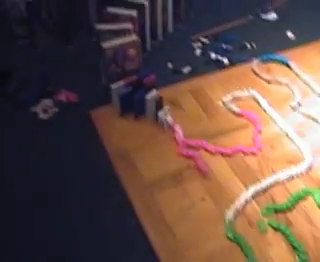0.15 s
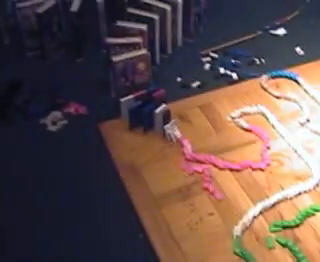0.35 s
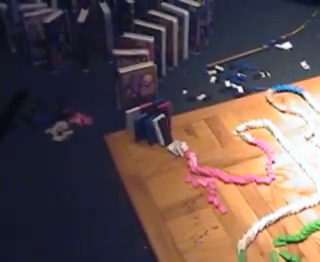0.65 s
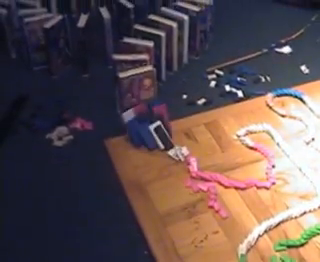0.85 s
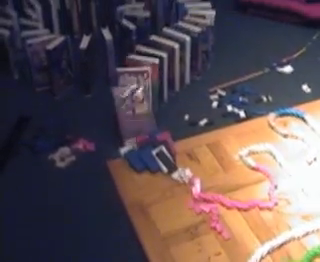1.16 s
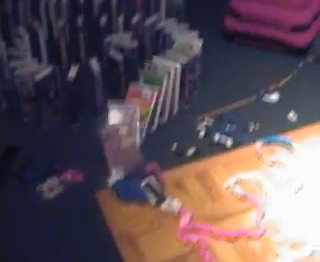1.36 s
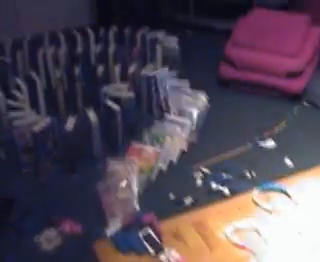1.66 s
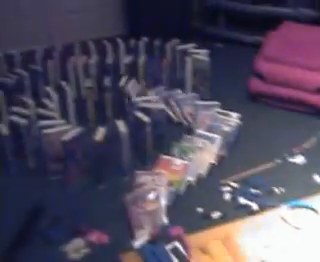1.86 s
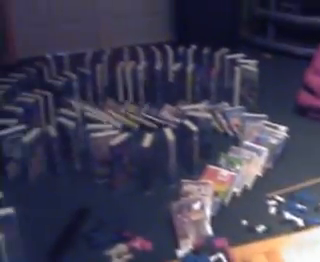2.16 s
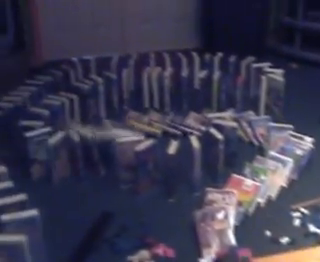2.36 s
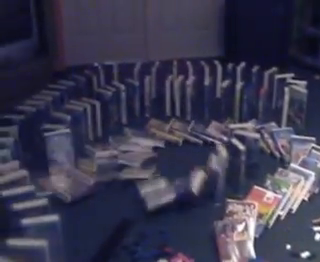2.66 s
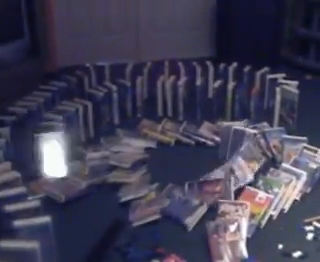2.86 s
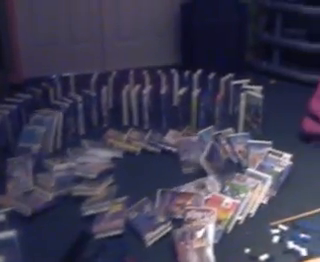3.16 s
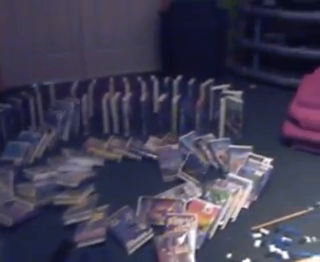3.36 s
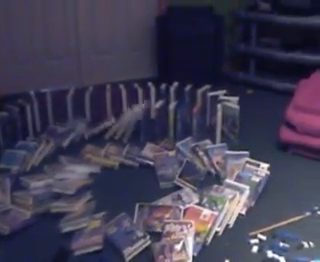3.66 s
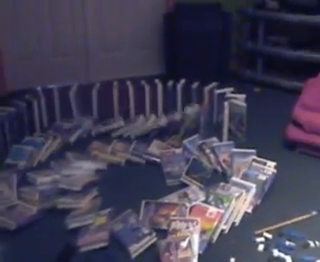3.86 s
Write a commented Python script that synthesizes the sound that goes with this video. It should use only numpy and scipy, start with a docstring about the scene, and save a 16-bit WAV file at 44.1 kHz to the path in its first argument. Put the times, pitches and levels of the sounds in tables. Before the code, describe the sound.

A domino run topples: light clicks, a few woody knocks, then a growing clatter of plastic cases

```python
"""A bare, echoing room in which a chain of dominoes falls before a close pair of microphones.
Small hard tiles patter on a wooden floor, a few larger blocks knock over, then a long spiral of hollow
plastic cases slaps down on carpet. Each contact is an impulse that excites damped modes (modal synthesis);
the room adds decaying noise as a diffuse echo. Low thumps of overload and a faint steady noise lie beneath."""
import sys
import numpy as np
from scipy import signal
from scipy.fft import rfft, irfft
from scipy.io import wavfile

SR = 44100
rng = np.random.default_rng(int(sys.argv[2]) if len(sys.argv) > 2 else 0)


def volts_from_db(level):
    """Convert decibel levels to linear amplitude ratios."""
    exponent = np.asarray(level, float) / 20
    return 10 ** exponent


def dump_mix(stems):
    """Bounce the given channels to the path in sys.argv[1] as a 16-bit WAV at rate SR."""
    frames = np.atleast_2d(stems).T  # one column per channel
    limited = np.clip(frames, -1, 1)  # hard clip at full scale
    pcm = np.round(limited * 32767).astype(np.int16)
    wavfile.write(sys.argv[1], SR, pcm)


N = 176400  # samples, 4 s
PLACES = 4  # each source sounds from this many spots, its listed contacts dealt in turn


def at_hz(points, hz):
    """Spectra are read on a logarithmic frequency axis, as pitch is heard."""
    table_hz, values = np.array(points).T
    return np.interp(np.log(hz), np.log(table_hz), values)


def short_modes(colour, low_hz, high_hz, cycles, count):
    """Constant damping per cycle: modes spread evenly in pitch decay by 60 dB in the same number of cycles."""
    modes = []
    for hz in np.geomspace(low_hz, high_hz, count):
        level_db = at_hz(colour, hz) + 20 * np.log10(hz / 1000)  # the colour, raised 6 dB per octave
        modes.append((hz, level_db, cycles / hz))
    return modes


def patter(rows, per_s, spread_db):
    """Random independent contacts: uniform times, table columns read there, exponential scatter in dB."""
    s, *columns = np.transpose(rows)
    candidates_per_s = 400
    draw = rng.random((int(candidates_per_s * (s[-1] - s[0])), 3))
    t = s[0] + draw[:, 0] * (s[-1] - s[0])
    scatter = -spread_db * np.log(1 - draw[:, 1] + 1e-3)
    silenced = draw[:, 2] > per_s / candidates_per_s  # thins the contacts to the wanted density
    db = np.interp(t, s, columns[0]) + scatter - 200 * silenced
    db = db - 10 * np.log10(per_s)  # denser contacts are each weaker
    return [t, db] + [np.interp(t, s, column) for column in columns[1:]]


def strike(t, db, modes, scatter_db, spread_s=0):
    """Modal impact: each contact excites every damped resonance with its own strength, sign and delay.
    db is contacts x modes; modes are (frequency [Hz], level [dB], t60 [s])."""
    gains = volts_from_db(db + scatter_db * rng.standard_normal(db.shape)) * rng.choice([-1, 1], db.shape)
    at = np.clip((t[:, None] + spread_s * rng.random(db.shape)) * SR, 0, N - 1).astype(int)
    out = np.zeros(N)
    for (hz, level_db, t60), gain, index in zip(modes, gains.T, at.T):
        radius, w = volts_from_db(-60 / (t60 * SR)), 2 * np.pi * hz / SR
        resonance = [1, -2 * radius * np.cos(w), radius * radius]
        # a soft contact low-passes the blow an octave above the mode
        p = np.exp(-2 * w)
        poles = np.convolve(resonance, [1, -2 * p, p * p])
        # the difference [1, -1] passes on no slow push
        zeros = np.cos(w / 2) * (1 - p) ** 2 * np.array([1, -1])
        blows = np.bincount(index, gain * volts_from_db(level_db), N) + 1e-18
        out += signal.lfilter(zeros, poles, blows)
    return out


def crack(t, db):
    """Broadband impact transient: many short modes make a crack; db is contacts x modes or one column."""
    # colour of a crack: (frequency [Hz], level [dB])
    crack_colour = [(250, -34), (700, -16), (1300, -12), (2500, -10.5), (4500, 0), (7500, -22.5),
                    (10000, -22), (13000, -35)]
    modes = short_modes(crack_colour, 310, 19000, cycles=6.0, count=30)
    return strike(t, db + np.zeros(len(modes)), modes, scatter_db=0.0, spread_s=0.0026)


def tiles(turn):
    """Stiff small bodies have high modes: hard tiles click on each other, singly and in a patter."""
    # single clear clicks: (time [s], relative ring level [dB], relative crack level [dB])
    tile_clicks = [(0.001, -24, -43.5), (0.047, -48, -46), (0.062, -35, -49), (0.0820, -22.5, -44),
                   (0.1121, -20, -53), (0.1431, -20, -39), (0.1795, -11, -26), (0.1884, -12.5, -50),
                   (0.2104, -16, -39), (0.2204, -25, -50), (0.2346, -27, -30), (0.264, -27, -56),
                   (0.3262, -22, -38), (0.3336, -21, -36.5), (1.3132, -27, -40.5), (1.3235, -23, -45),
                   (1.368, -12.5, -54), (1.376, -14.5, -43), (1.4194, -36, -47), (1.5264, -30, -42),
                   (1.5582, -39, -52), (1.684, -18, -50), (1.699, -30, -41), (1.7147, -26, -48)]
    # patter of the tile row: (time [s], relative level [dB])
    tile_patter = [(0, -50), (.1, -35.5), (.22, -40), (.3, -44.5), (.36, -48), (.42, -75), (1.3, -79),
                   (1.33, -48), (1.43, -51), (1.6, -56), (1.68, -69), (1.74, -57), (1.8, -66)]
    # modes of a middling tile: (frequency [Hz], level [dB], t60 [s])
    tile_modes = [(4310, -16, 0.014), (5122, 3, 0.032), (5570, -9, 0.018), (6800, -4, 0.0035),
                  (8620, -6, 0.014), (11730, -8, 0.0081)]
    tiles_per_s, pitch_step = 230, 0.0078  # over all spots; relative pitch from spot to spot
    patter_t, patter_db = patter(tile_patter, tiles_per_s / PLACES, spread_db=3.5)
    click_t, ring_db, crack_db = np.transpose(tile_clicks[turn::PLACES])
    t, patter_db = np.r_[click_t, patter_t], patter_db + 13
    pitch = 1 + pitch_step * (turn - (PLACES - 1) / 2)
    modes = [(hz * pitch, level_db, t60) for hz, level_db, t60 in tile_modes]
    ring_levels = np.r_[ring_db - 12, patter_db][:, None] + np.zeros(len(modes))
    rings = strike(t, ring_levels, modes, scatter_db=2.0, spread_s=0.0014)
    cracks = crack(t, np.r_[crack_db, patter_db - 18.5][:, None])
    return signal.sosfilt(signal.butter(6, 12800, fs=SR, output="sos"), rings + cracks)


def blocks(turn):
    """Larger bodies have lower modes: blocks knock, each with its own spectral tilt, and rattle between."""
    # knocks: (time [s], relative level [dB], brightness [dB per octave])
    block_knocks = [(0.4234, -26.5, -7), (0.5387, -13.5, 3), (0.5529, -25.5, -8), (0.630, -5.5, 4.5),
                    (0.6338, -12.5, 10.5), (0.6415, -10, -5), (0.7639, -10, 5.5), (0.7722, -18.5, -4.5),
                    (0.823, -17.5, -6), (0.8389, -11, 2.5), (0.859, -23, -1), (0.8787, -15.5, -5.5),
                    (0.9748, -18.5, -5), (0.9822, -12.5, 3), (0.9888, -9.5, 1.5), (1.0294, -12, -1),
                    (1.0698, -18.5, -3.5)]
    # blocks sliding and settling: (time [s], relative level [dB])
    block_rattle = [(.4, -52), (.45, -50.5), (.62, -73), (.66, -35.5), (.75, -40), (.87, -27), (.96, -42),
                    (1.02, -28), (1.1, -40.5), (1.16, -79.5)]
    # block modes: (frequency [Hz], level [dB], t60 [s])
    block_modes = [(352, -21.5, 0.045), (570, -5.5, 0.0067), (1356, 1, 0.0067), (1530, 2, 0.0038),
                   (2020, -2, 0.012), (3030, 0.5, 0.0049), (5060, -8.5, 0.0084), (6250, -12.5, 0.0077),
                   (8440, -25, 0.012), (9400, -15.5, 0.0089)]
    rattles_per_s, tilt_pivot_hz = 300, 2000  # the rate is over all spots
    rattle_t, rattle_db = patter(block_rattle, rattles_per_s / PLACES, spread_db=4.0)
    knock_t, knock_db, bright = np.transpose(block_knocks[turn::PLACES])
    t = np.r_[knock_t, rattle_t]
    db = np.r_[knock_db - 11, rattle_db + 11][:, None]
    bright = np.r_[bright, 0 * rattle_t][:, None]  # the rattle is untilted
    ring_octaves = np.log2(np.array(block_modes)[:, 0] / tilt_pivot_hz)
    rings = strike(t, db + bright * ring_octaves, block_modes, scatter_db=2.0, spread_s=.0012)
    crack_octaves = np.log2(np.geomspace(260, 13000, 30) / tilt_pivot_hz)
    cracks = crack(t, db - 11 + bright * crack_octaves)
    return signal.sosfilt(signal.butter(4, 8830, fs=SR, output="sos"), rings + cracks)


def cases(turn):
    """Heavily damped shell modes: hollow cases slap down in rapid repeated touches amid a clatter."""
    # slaps: (time [s], then relative levels of crack [dB], thud [dB], knock [dB], clack [dB])
    case_slaps = [(1.1887, -34.5, -29.5, -40, -31), (1.2417, -38, -47, -49, -35),
                  (1.2741, -34, -28.5, -39, -39), (1.321, -35, -29, -37, -27), (1.3881, -29, -20, -47, -31),
                  (1.4387, -23.5, -19.5, -37, -22.5), (1.5333, -41, -23.5, -37, -28),
                  (1.6288, -42, -32, -52, -37), (1.7179, -23.5, -25, -35, -25),
                  (1.8328, -29, -28, -36, -34), (1.8986, -28.5, -36, -23, -41),
                  (1.955, -19.5, -22, -23, -27.5), (2.0195, -23.5, -23, -34, -23.5),
                  (2.1391, -29.5, -33, -32, -32), (2.2299, -46, -28, -31, -44),
                  (2.2706, -28, -24.5, -25.5, -31), (2.3667, -26, -27, -32, -27.5),
                  (2.5597, -26, -23.5, -30, -30), (2.583, -30, -26.5, -26, -40),
                  (2.6604, -16, -11.5, -18.5, -14), (2.799, -50, -30, -28, -28),
                  (2.8564, -31, -31, -48, -45), (2.8957, -31, -17.5, -25, -17.5),
                  (2.9122, -21.5, -36.5, -20, -43), (3.008, -15, -21.5, -12.5, -13),
                  (3.029, -16.5, -22, -14.5, -28), (3.0594, -43, -40, -20, -47),
                  (3.089, -40, -49, -24, -48), (3.1868, -20.5, -20, -25, -24.5),
                  (3.249, -20, -24, -17.5, -24), (3.3311, -16.5, -26, -19, -31.5),
                  (3.3475, -25, -25, -44, -21.5), (3.3985, -35, -26, -41, -47),
                  (3.4834, -23, -23, -20.5, -34), (3.5040, -15.5, -25.5, -17, -24),
                  (3.5498, -18.5, -23.5, -23, -30), (3.5793, -21.5, -24.5, -46, -37),
                  (3.6295, -14.5, -28, -16, -13.5), (3.649, -45, -53, -25, -19),
                  (3.7124, -24, -20, -33, -21), (3.7827, -26, -23, -33, -33), (3.843, -28, -38, -44, -31),
                  (3.9405, -22.5, -31.5, -24, -42), (3.9713, -20.5, -40, -33, -25)]
    # clatter of the falling spiral: (time [s], relative level [dB], brightness [dB per octave])
    case_clatter = [(1.12, -47.5, -0.5), (1.35, -30.5, -0.5), (1.51, -30, 0.5), (2.21, -28.5, 1),
                    (2.42, -36, 1), (2.62, -34, 2.5), (2.74, -27, 0.5), (2.86, -30.5, 2), (3.16, -27, 1),
                    (3.39, -31, 0), (3.65, -26, -0.5), (3.77, -30, 2), (4.0, -22, -2)]
    # colour of a hollow case: (frequency [Hz], level [dB])
    case_colour = [(100, -21.5), (200, -6.5), (300, 2.5), (420, 2.5), (650, -6.5), (1000, -7), (1500, -7.5),
                   (3000, -18), (6000, -27), (10000, -47), (15000, -104)]
    thud_hz, knock_hz, clack_hz, crack_hz = 288, 670, 1340, 2700
    touches, apart_s, loss_db, first_db = 7, .004, 1.48, 1.5  # mean spacing; loss per touch; first is harder
    clatters_per_s = 230  # over all spots
    shift = 1.04 ** turn  # each spot has its own pitch
    modes = short_modes(case_colour, 110 * shift, 13000 * shift, cycles=9.62, count=31)
    hz = np.array(modes)[:, 0]

    rows = np.array(case_slaps)[turn::PLACES]
    band_db = rows[:, [2, 3, 4, 1]] + [5.77, 8.5, 6.2, 7.04]  # thud, knock, clack, crack
    band_hz = (thud_hz, knock_hz, clack_hz, crack_hz)
    slap_colour = np.array([at_hz(list(zip(band_hz, row)), hz) for row in band_db])
    k = np.arange(touches)
    slap_t = rows[:, :1] + apart_s * k * rng.uniform(.6, 1.4, (len(rows), touches))
    touch_db = -9.5 - loss_db * k + first_db * (k == 0)
    slaps = (slap_colour[:, None] + touch_db[:, None]).reshape(-1, len(hz))

    clatter_t, db, bright = patter(case_clatter, clatters_per_s / PLACES, spread_db=2.5)
    clatter = db[:, None] + 5.0 + bright[:, None] * np.log2(hz / 500)
    t = np.r_[slap_t.ravel(), clatter_t]
    return strike(t, np.r_[slaps, clatter], modes, scatter_db=4.0, spread_s=.0015)


def hollow_notes(turn):
    """Cavity resonance: the heaviest landings also sound the air inside one case, a single short note."""
    # air notes: (time [s], frequency [Hz], relative level [dB], t60 [s])
    air_notes = [(2.659, 330, -4, 0.015), (2.685, 299, -10.5, 0.029), (3.007, 395, -8.5, 0.036),
                 (3.036, 670, -13.5, 0.087), (3.060, 670, -13.5, 0.055), (3.092, 700, -17, 0.059),
                 (3.138, 643, -23, .06), (3.6255, 1494, -14, .015), (3.640, 1400, -18, 0.012)]
    out = np.zeros(N)
    for s, hz, db, t60 in air_notes[turn::PLACES]:
        out += strike(np.array([s]), np.array([[db]]), [(hz, 0, t60)], scatter_db=1)
    return out


def room(x, wet_db):
    """Diffuse reverberation: noise that builds, then decays band by band, mostly alike at both microphones."""
    # reverberation time: (frequency [Hz], t60 [s])
    reverb_t60 = [(100, 0.31), (400, 0.62), (1500, 0.63), (5000, 0.36), (12000, 0.2)]
    # unshared part of the echo: (frequency [Hz], level [dB])
    unshared_echo = [(100, -47), (500, -23), (1500, -13.5), (4000, -8.5), (8000, -4), (13000, -11)]
    first_echo_s, build_s = 0.00087, 0.0031
    t = np.arange(SR) / SR
    hz = np.maximum(np.fft.rfftfreq(SR, 1 / SR), 1)
    rise = 1 - np.exp(-np.maximum(t - first_echo_s, 0) / build_s)
    white = rng.standard_normal((2, SR))
    echo = 0
    for centre in 62.5 * 2. ** np.arange(9):  # overlapping octave bands
        decay = volts_from_db(-60 * t / at_hz(reverb_t60, centre))
        share = np.clip(1 - abs(np.log2(np.clip(hz, 62.5, 16000) / centre)), 0, 1)
        echo = echo + share * rfft(white * rise * decay) * np.sqrt(28 / SR)
    echo[1] *= volts_from_db(at_hz(unshared_echo, hz))
    responses = irfft(echo, SR)
    mid, side = signal.fftconvolve(x[None], responses, axes=1)[:, :N] * volts_from_db(wet_db)
    return np.array([x + mid + side, x + mid - side])


def low_thumps():
    """Damped oscillator: at the loudest impacts the recorder overloads and its level swings slowly."""
    # thumps at listed impacts: (time [s], relative level [dB])
    overload_thumps = [(0.631, -65), (2.661, -44), (3.012, -60), (3.989, -49)]
    s, db = np.transpose(overload_thumps)
    return strike(s, db[:, None] + 12, [(27.5, 0, .2)], scatter_db=0)


def room_tone():
    """Stationary coloured noise: a faint steady tone of the room, nearly alike in both channels."""
    # spectrum of the noise: (frequency [Hz], relative level [dB])
    tone_colour = [(30, -28), (62, -4), (110, -19), (210, -10), (380, 5), (2000, 0.5), (8000, -14),
                   (15000, -31)]
    hz = np.maximum(np.fft.rfftfreq(N, 1 / SR), 1)
    mid, side = rfft(rng.standard_normal((2, N))) * volts_from_db(at_hz(tone_colour, hz))
    tone = irfft([mid + 0.1 * side, mid - 0.17 * side], N)
    return volts_from_db(-52.5) * tone / tone.std()


def scene():
    """Superposition: every spot adds its own echo; the microphone's high-pass thins the deep bass."""
    # echo level of the sources in the order below: (level [dB])
    echo_db = [6.5, 5.0, 5.5, -1]
    picked_up = np.zeros((2, N))
    for source, wet_db in zip((tiles, blocks, cases, hollow_notes), echo_db):
        for turn in range(PLACES):
            picked_up += room(source(turn), wet_db)
    picked_up = signal.sosfilt(signal.butter(2, 114, "high", fs=SR, output="sos"), picked_up)
    left_db, right_db = 0.3, 2
    return (picked_up + low_thumps() + room_tone()) * volts_from_db(np.array([[left_db], [right_db]]))


def roll_off(x):
    """The treble ends steeply here."""
    return signal.sosfilt(signal.butter(12, 15710, fs=SR, output="sos"), x)


def record(dry):
    """Low-pass filtering and soft saturation: the top is rolled off and peaks are gently rounded."""
    dull = signal.sosfilt(signal.butter(4, 12800, fs=SR, output="sos"), dry)
    mix = 1.054 * np.tanh(dull / 0.8)
    return roll_off(mix)


dry = scene()
out = record(dry)
dump_mix(out)
```